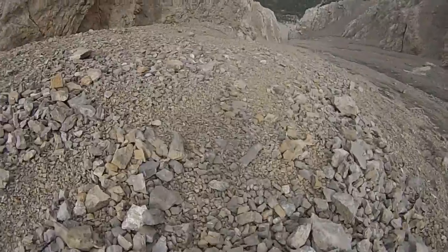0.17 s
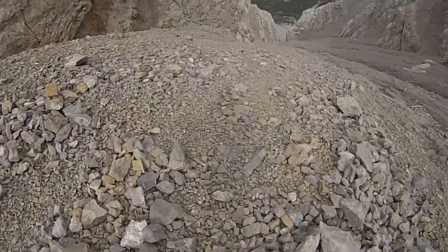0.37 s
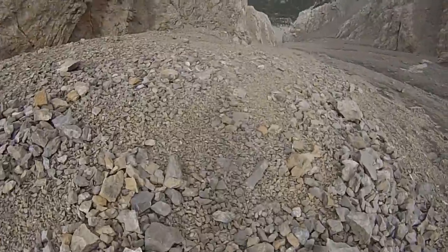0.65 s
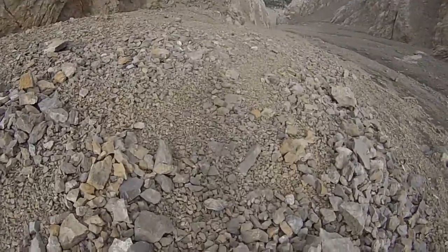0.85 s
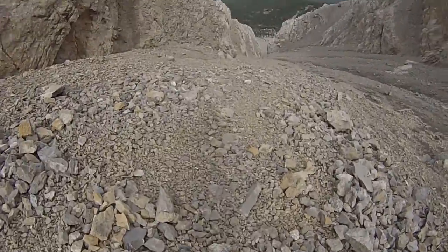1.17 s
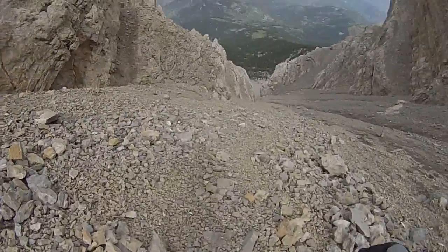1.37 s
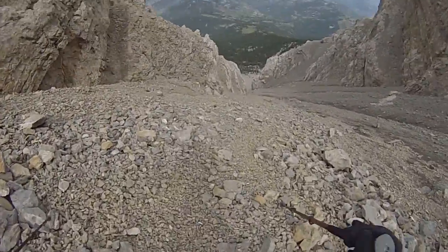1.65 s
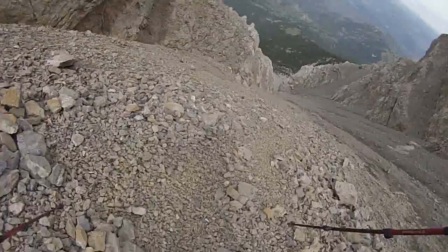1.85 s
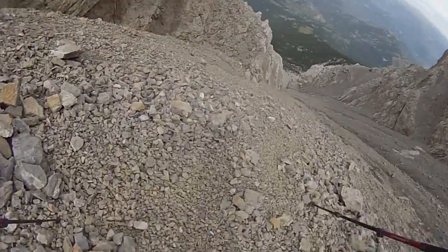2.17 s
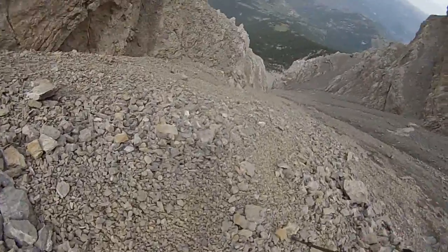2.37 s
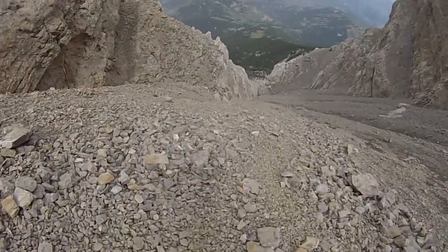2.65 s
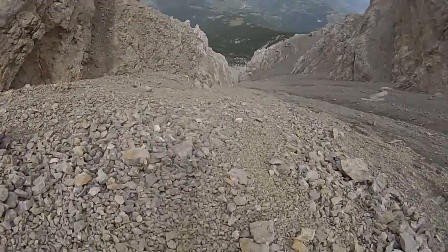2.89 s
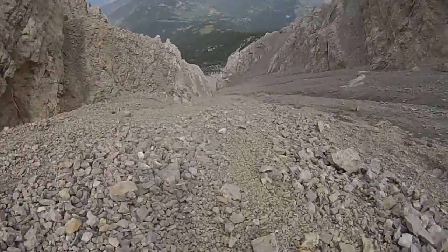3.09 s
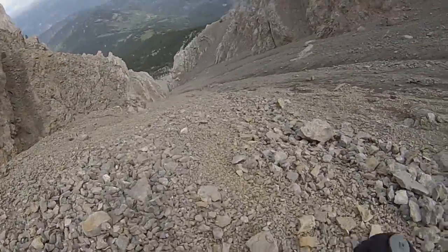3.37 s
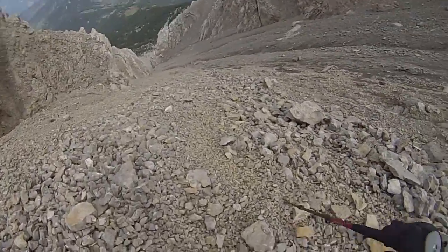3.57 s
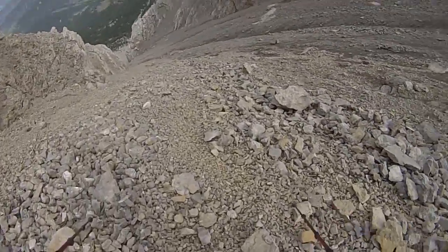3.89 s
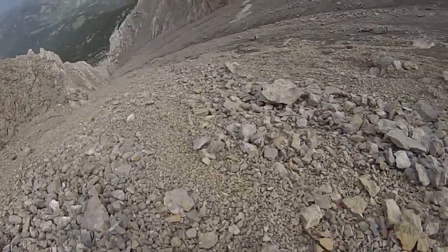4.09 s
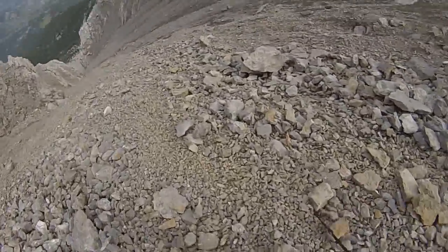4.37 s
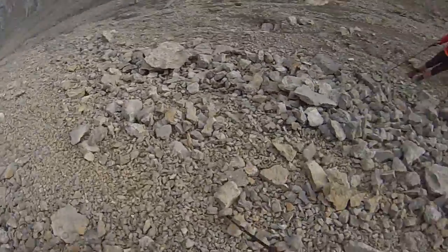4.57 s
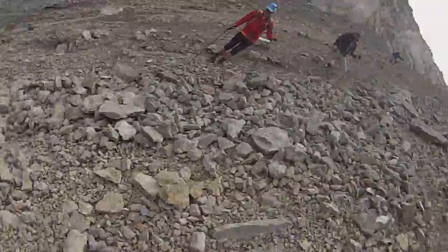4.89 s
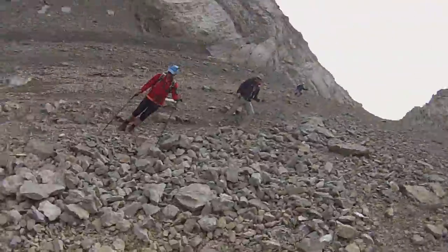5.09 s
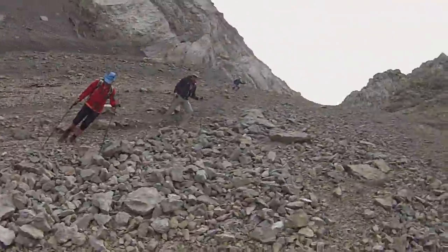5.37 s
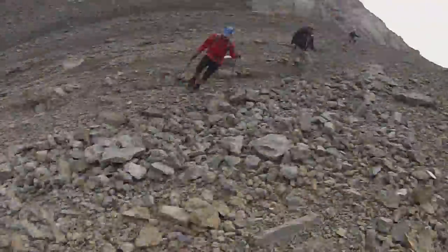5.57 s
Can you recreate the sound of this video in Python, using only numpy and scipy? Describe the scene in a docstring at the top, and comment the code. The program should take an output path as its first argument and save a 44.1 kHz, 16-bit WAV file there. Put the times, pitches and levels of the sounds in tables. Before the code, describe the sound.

Descending a steep scree slope, someone's steps grind coarse stones and fine grit. Short dry knocks of rocks and pole tips scatter over the crunch; one pole strike rattles briefly early on. The gravel hiss thickens from the middle, peaks just after four seconds with thin metal ticks and bright snaps, then eases but continues. Wind and steps jolt the enclosed microphone into low lumpy rumble; the sound is mono and hollow.

```python
"""Boots slide over loose scree on a steep slope, heard from inside a hard sealed case.
From the start, wind and steps shake the case into a rumble (shaped noise) over a faint steady hiss.
Stones and grit crunch (many tiny rings) and single stones and pole tips knock (noise and rings);
at 1.8 s a pole tip chatters on rock and scrapes (noise through the modes of its shaft).
After 4 s a small metal part tinkles (fading sines) and grit snaps (short noise); the slide goes on."""
import sys
import numpy as np
from scipy import signal
from scipy.fft import rfft, irfft, next_fast_len
from scipy.io import wavfile
from scipy.ndimage import uniform_filter1d

SR = 44100
rng = np.random.default_rng(int(sys.argv[2]) if len(sys.argv) > 2 else 0)


def bounce(signal):
    """Save signal as a 16-bit WAV file at the path given by the first command-line argument."""
    frames = np.transpose(np.atleast_2d(signal))
    limited = np.clip(frames, -1, 1)
    pcm = np.round(limited * 32767).astype(np.int16)
    wavfile.write(sys.argv[1], SR, pcm)


N = 253134  # length in samples


def amp(db):
    """Turns decibels into a plain amplitude factor."""
    return 10 ** (np.asarray(db) / 20)


def evened(x):
    """Scales a sound to rms 1, so that its level can be set afterwards."""
    return x / np.sqrt(np.mean(x ** 2) + 1e-20)


def read(points, hz):
    """Reads a curve between its points, along a logarithmic pitch scale."""
    f, value = np.transpose(points)
    return np.interp(np.log(hz + 1), np.log(f + 1), value)


def columns(rows):
    """Draws each level column of a table as a smooth line over time."""
    s, *values = np.transpose(rows)
    return [np.interp(np.arange(N) / SR, s, v) for v in values]


def add(mix, s, sound):
    """Lays a short sound into the mix at s seconds, cut off at the end."""
    part = mix[round(s * SR):][:len(sound)]
    part += sound[:len(part)]


def band_filter(order, lo_hz, hi_hz):
    """A filter that lets one band of pitches through."""
    return signal.butter(order, [lo_hz, hi_hz], "band", fs=SR, output="sos")


def noise(spectrum):
    """Steady noise of rms 1 with the given spectrum."""
    hz = np.fft.rfftfreq(N, 1 / SR)
    white = rfft(rng.standard_normal(N))
    return evened(irfft(white * amp(read(spectrum, hz)), N))


def flutter(length_s):
    """Slow chance of rms 1 that changes over about length_s."""
    size = max(int(length_s * SR), 2)
    once = uniform_filter1d(rng.standard_normal(N), size)
    return evened(uniform_filter1d(once, size))


# the slide underfoot: t/s, coarse stones level/dB, fine grit level/dB
SLIDE_LEVELS = [(0, -62, -87), (.22, -67, -80), (.4, -50, -63.5), (.64, -46.5, -58), (.8, -50, -58),
                (.9, -57, -70.5), (1.32, -57.5, -74), (1.47, -54.5, -59.5), (1.55, -59.5, -51),
                (1.66, -53, -55.5), (1.72, -59, -59.5), (1.96, -54.5, -63), (2.27, -62, -80),
                (2.37, -52.5, -59.5), (2.44, -55, -64.5), (2.58, -52, -49), (2.9, -52, -49.5),
                (3.2, -53.5, -52), (3.88, -52.5, -53), (4.04, -49.5, -47.5), (4.08, -46, -46.5),
                (4.72, -49, -46), (5.2, -53, -53.5), (5.45, -54, -56.5), (5.74, -54.5, -55.5)]
SLIPS_PER_S, SLIP_FADE_S = 140, 0.0057  # each slip fades to 1/e in this time
# sand follows the grit, more steeply, down to a resting level
SAND_DB, SAND_AT_GRIT_DB, SAND_STEEPNESS, SAND_REST_DB = -55, -49.5, 1.24, -70.5
# loose single stones follow the coarse crunch dB for dB
CLATTER_DB, CLATTER_AT_COARSE_DB, CLATTER_STEEPNESS = -59, -51, 1


def slide():
    """Coarse stones give the low crunch, grit the hiss, sand the bright top; single stones clatter."""
    coarse_db, fine_db = columns(SLIDE_LEVELS)
    sand_db = np.maximum(SAND_DB + SAND_STEEPNESS * (fine_db - SAND_AT_GRIT_DB), SAND_REST_DB)
    clatter_db = CLATTER_DB + CLATTER_STEEPNESS * (coarse_db - CLATTER_AT_COARSE_DB)

    # the boot slips in jerks that move all stones together; each starts at once and fades
    jerks = (rng.random(N) < SLIPS_PER_S / SR) * rng.random(N)
    slips = evened(signal.lfilter([1], [1, -np.exp(-1 / (SLIP_FADE_S * SR))], jerks))

    coarse = crunch(700, 4100, per_s=2200, spread_db=1.5, cycles=2.2, clump_db=2.0, slips=slips)
    fine = crunch(3800, 8900, per_s=4000, spread_db=2.5, cycles=0.79, clump_db=2.5, slips=slips)
    sand = crunch(8500, 14000, per_s=8000, spread_db=4.0, cycles=2.5, clump_db=2.0, slips=slips, top=4.8)
    clatter = crunch(1273, 5070, per_s=300, spread_db=3.5, cycles=4.3, clump_db=2.0, slips=slips, top=1.3)
    stones = amp(coarse_db) * coarse + amp(clatter_db) * clatter
    return stones + amp(fine_db) * fine + amp(sand_db) * sand


def crunch(lo_hz, hi_hz, per_s, spread_db, cycles, clump_db, slips, top=6, count=24):
    """Many small stones strike each other in clumps; each rings a few cycles at its own pitch."""
    hardness_db = spread_db * np.minimum(rng.exponential(1, N), top)  # few hard hits, many soft
    clumping_db = clump_db * evened(slips + 0.95 * flutter(0.043))
    struck = (rng.random(N) < per_s / SR) * rng.choice([-1., 1.], N)
    hits = amp(hardness_db + clumping_db) * struck
    stone = rng.integers(0, count, N)  # which stone is hit at each moment
    t, out = np.arange(600) / SR, np.zeros(N)
    for k, hz in enumerate(np.geomspace(lo_hz, hi_hz, count)):
        ring = np.exp(-t * hz / cycles) * np.sin(2 * np.pi * hz * t)
        out += signal.oaconvolve(hits * (stone == k), ring / np.linalg.norm(ring))[:N]
    return evened(signal.oaconvolve(out, case_taps())[:N])


# slope of sound through the case wall: f/Hz, level/dB
WALL_SLOPE = [(200, -9.5), (900, -18.5), (1300, -15.5), (3000, -4), (6000, -6), (8000, -16), (11500, -22),
              (12500, -31.5), (15000, -31)]
# resonances and notches of the air inside the case: f/Hz, width/Hz, level/dB
CAVITY_MODES = [(1538, 760, 17.5), (1792, 142, -10), (1950, 130, 0.5), (2550, 366, 8), (3300, 550, 4),
                (3946, 340, -5.5), (4570, 310, 7), (5170, 220, 8), (5580, 210, 2), (5860, 180, -9),
                (6650, 510, 6.5), (7410, 990, 8.5), (9820, 270, -5.5), (11440, 1300, 2.5)]


def case_taps():
    """Answer of case wall and cavity to a click: the phase follows from the log gain."""
    hz = abs(np.fft.fftfreq(4096, 1 / SR))
    db = read(WALL_SLOPE, hz)
    for f, width, gain_db in CAVITY_MODES:
        db = db + gain_db / (1 + (2 * (hz - f) / width) ** 2)
    # this phase lets nothing sound before the click
    response = np.exp(np.conj(signal.hilbert(np.log(amp(db)))))
    return np.fft.ifft(response).real[:1024]


# single knocks of stones and pole tips: t/s, thud peak level/dB, stone f/Hz,
# stone ring level/dB relative to thud, treble level/dB relative to thud
KNOCK_BLOWS = [(0.344, -42.5, 2860, 4.5, -5.5), (0.456, -41, 2780, -6, -19), (0.481, -43, 2620, 6, -7),
               (0.526, -41.5, 2560, -2, -10), (0.534, -47, 2630, 6, -8), (0.547, -36.5, 2660, 3, -10),
               (0.607, -44.5, 2970, 7, 4.5), (0.669, -38, 2600, -12, -20), (0.745, -46, 2650, 7.5, 4),
               (0.786, -42.5, 2510, 4, -12), (0.631, -30, 3330, -6, -30), (0.659, -41, 3300, 12.5, -26),
               (0.857, -44.5, 2500, 5, -10), (1.048, -42, 2500, 1.5, -30), (1.197, -38.5, 2400, -2, -33),
               (1.209, -44.5, 2700, 6.5, -4), (1.293, -47.5, 3260, 6, -24), (1.418, -42.5, 2520, -1, -15),
               (1.565, -43, 2570, 0, 6), (1.654, -40.5, 2400, -1.5, -22), (1.667, -44.5, 2550, 9, -13),
               (1.679, -54.5, 4540, -1, 17), (1.822, -32, 2880, -5, -13), (2.03, -52, 3220, 8.5, 4),
               (2.093, -39, 1850, 1, -25), (2.353, -42, 2620, -3, -9), (2.444, -52, 3220, 11, -15),
               (2.917, -40, 2630, 2, 3), (3.087, -53, 3300, 16, -10), (3.326, -39.5, 2600, -4, 0),
               (3.415, -38, 2600, -1, -2), (3.495, -37, 1970, 5.5, -2), (3.495, -38, 2950, 4, -6),
               (3.4963, -48, 4270, 10, 0), (3.498, -33, 2860, -1, -15), (3.509, -38, 2860, -3, -15),
               (3.531, -40, 2000, -8, -18), (3.596, -46, 2580, 6, -12), (3.606, -39.5, 2300, 1, -8),
               (3.783, -38.5, 2630, -3.5, -19), (3.911, -48, 2580, 9, -8), (3.932, -37.5, 2550, 0, -13),
               (4.01, -32, 2940, 0.5, 0.5), (4.054, -35.5, 2550, 2, -7), (4.062, -32.5, 4700, -1, -8),
               (4.152, -36, 2630, -5, -12), (4.141, -37.5, 4660, 3, -12), (4.179, -34.5, 4540, 3.5, -16),
               (4.187, -36, 3000, 0, -2), (4.284, -36, 4850, -1, -10), (4.399, -30, 4570, -5, -4),
               (4.417, -37.5, 3300, -3, 0), (4.509, -30.5, 2500, 0.5, -14), (4.569, -40, 2650, 9, -15),
               (4.58, -35.5, 2550, 4, -14), (4.605, -40.5, 2900, 7, -11), (4.633, -36, 2500, -16, -18),
               (4.828, -30.5, 3040, -1.5, -26), (4.877, -40.5, 5170, 4, -16),
               (5.044, -36.5, 4600, 4.5, -16), (5.093, -38.5, 2610, 0, -13), (5.174, -41.5, 2600, -16, -20),
               (5.248, -36, 2680, -2, -24), (5.261, -39.5, 1950, 6, -2), (5.301, -45.5, 4200, 6.5, 5),
               (5.33, -40, 2600, 0, -20), (5.375, -40, 2600, -5, -20), (5.419, -35.5, 4900, -1, 4),
               (5.43, -43, 1840, 11, -23), (5.473, -55.5, 4800, 18, -6), (5.678, -32.5, 2520, -20, -30),
               (5.694, -33.5, 2950, -4, -15), (5.706, -44.5, 4360, 7, -1)]
KNOCK_T60_S = 0.023  # main fade of a blow, down by 60 dB


def knocks():
    """A blow: dull thud, the stone's short ring, a splash of treble; loosened pebbles trickle after."""
    out, t, taps = np.zeros(N), np.arange(4000) / SR, case_taps()
    low, high = band_filter(2, 700, 1900), band_filter(1, 4300, 12500)
    blow = amp(-60 * t / KNOCK_T60_S)
    trickle = amp(-23 - 60 * t / .12)
    fade = (blow + trickle) * np.minimum(t / .001, 1)
    case_mode = np.sin(2 * np.pi * 1450 * t) * amp(-60 * t / .02)  # the case's lowest mode answers

    rattles = rng.standard_normal((len(KNOCK_BLOWS), 3, len(t)))
    for (s, db, hz, ring_db, treble_db), (a, b, c) in zip(KNOCK_BLOWS, rattles):
        thud = evened(signal.sosfilt(low, a)) + 3.5 * case_mode
        rough = evened(signal.sosfilt(band_filter(2, hz * 0.825, hz * 1.15), c))
        ring = np.sin(2 * np.pi * hz * t) * amp(-60 * t / 0.012) + 0.19 * rough
        treble = signal.sosfilt(high, b) * amp(-60 * t / 0.12)  # fades sooner than the thud's noise
        levels_db = db, db + ring_db, db + treble_db
        for part, part_db in zip((thud, ring, treble), levels_db):
            heard = np.convolve(part * fade, taps[:400])[:len(t)]
            add(out, s, amp(part_db) * heard / abs(heard).max())
    return out


# modes of the pole shaft: f/Hz, width/Hz, level/dB
SHAFT_MODES = [(1342, 255, 5.5), (1900, 340, -3.5), (2850, 290, 0.5), (3630, 300, -0.5), (4150, 320, -4),
               (5100, 410, -5), (6500, 1000, -6.5), (8000, 3400, -11.5)]
# the pole tip strikes rock, chatters, then scrapes on; the scrape level is relative to the chatter
POLE_S, POLE_DB, POLE_CHATTER_S, POLE_SCRAPE_DB, POLE_SCRAPE_T60_S = 1.7663, -35.5, .008, -9, .3


def pole():
    """Rough contact drives the modes of the shaft: a hard chatter that drops to a fading scrape."""
    out, t = np.zeros(N), np.arange(6000) / SR
    contact = rng.standard_normal(len(t))
    shaft = np.zeros(len(t))
    for hz, width, db in SHAFT_MODES:
        mode = signal.sosfilt(band_filter(2, hz - width / 2, hz + width / 2), contact)
        shaft += amp(db) * evened(mode)
    chatter = np.minimum(t / .001, 1) * amp(-2500 * np.maximum(t - POLE_CHATTER_S, 0))
    scrape = amp(POLE_SCRAPE_DB - 60 * t / POLE_SCRAPE_T60_S)
    add(out, POLE_S, amp(POLE_DB) * evened(shaft) * (chatter + scrape))
    return out


# tinkles of a small metal part; held loosely it rings on:
# t/s, level/dB before the fade, f/Hz, time to fade by 60 dB/s
METAL_TINKLES = [(4.3006, -52, 9400, .03), (4.3774, -43, 9380, .03), (4.5131, -48, 9445, 0.11),
                 (4.5346, -37.5, 9300, .025), (4.551, -58, 9445, 0.082), (4.7691, -48, 9445, 0.098),
                 (4.784, -56, 9445, 0.086), (4.7975, -52, 9400, 0.089), (4.8888, -54, 9445, 0.082),
                 (4.9601, -34.5, 9520, 0.02)]


def tinkles():
    """One thin high mode, rung now and then."""
    out, t = np.zeros(N), np.arange(5000) / SR
    for s, db, hz, t60 in METAL_TINKLES:
        fade = amp(db - 60 * t / t60) * np.minimum(t / 0.0008, 1)
        add(out, s, fade * np.sin(2 * np.pi * hz * t))
    return out


# very bright snaps of splintering grit: t/s, peak level/dB
GRIT_SNAPS = [(4.0477, -47), (4.2238, -49), (4.4784, -49), (4.4837, -45), (4.688, -35), (4.6974, -44),
              (4.7721, -49), (4.8534, -45)]
SNAP_HZ, SNAP_T60_S = 11360, 0.011


def snaps():
    """A tiny splinter of noise around one high pitch."""
    out, t = np.zeros(N), np.arange(800) / SR
    band = band_filter(2, SNAP_HZ * 0.96, SNAP_HZ * 1.03)
    bursts = rng.standard_normal((len(GRIT_SNAPS), len(t)))
    for (s, db), burst in zip(GRIT_SNAPS, bursts):
        snap = signal.sosfilt(band, burst) * amp(-60 * t / SNAP_T60_S)
        add(out, s, amp(db) * snap / abs(snap).max())
    return out


# spectrum shape of the deep rumble: f/Hz, relative level/dB per Hz
DEEP_SPECTRUM = [(7.1, -24), (12, 2), (27, 0), (39, 3), (51, -9), (62, -28), (85, -86), (150, -120)]
# spectrum shape of the upper rumble: f/Hz, relative level/dB per Hz
UPPER_SPECTRUM = [(40, -7.5), (60, 12), (100, -14.5), (150, -21.5), (220, -37.5), (400, -49), (1000, -120)]


def rumble():
    """The case rocks in deep swings with uneven thumps; harder gusts add lumpy higher pressure."""
    deep_gain, upper_gain = shaking()
    deep = amp(1.8 * flutter(0.031)) * steadied(noise(DEEP_SPECTRUM), slack=0.69)
    upper = amp(1.8 * flutter(0.065)) * steadied(noise(UPPER_SPECTRUM), slack=0.17)
    return deep_gain * evened(deep) + upper_gain * evened(upper)


def steadied(x, slack):
    """Evens out the slow swings of a noise, the more the smaller the slack."""
    swing = abs(signal.hilbert(x, next_fast_len(N))[:N])
    return evened(x / (uniform_filter1d(swing, 1500) + abs(slack)))


# gusts and jolts that shake the case: middle of the rise t/s, time until the fall/s,
# deep rumble level/dB, upper rumble level/dB relative to deep
CASE_JOLTS = [(0.06, 0.21, -44, -27), (0.284, 0.1, -27, -11), (0.453, 0.14, -33, -10.5),
              (0.628, 0.18, -29, -15), (1.204, 0.043, -40, -16), (1.46, 0.07, -28, -14),
              (1.543, 0.1, -25.5, -7), (1.774, 0.031, -37.5, -10), (2.244, 0.5, -44, -16),
              (2.537, 0.21, -26, -11.5), (2.821, 0.11, -23, -14), (2.962, 0.4, -38, -17.5),
              (3.327, 0.17, -22, -18), (3.613, 0.18, -32.5, -12), (3.918, 0.31, -30, -13.5),
              (4.079, 0.2, -27.5, -7.5), (4.332, 0.24, -31.5, -12.5), (4.686, 0.25, -30, -14.5),
              (4.989, 0.23, -32, -10.5), (5.3, 0.21, -50.5, 0)]
JOLT_RISE_S, JOLT_FALL_DB_PER_S, CALM_DB, CALM_UPPER_DB = .06, 160, -45, -63


def shaking():
    """Jolts rise fast, hold and fall over a calm floor: gains of the deep and upper rumble."""
    t = np.arange(N) / SR
    power = amp([[CALM_DB], [CALM_UPPER_DB]]) ** 2 * np.ones(N)
    for s, hold_s, db, upper_db in CASE_JOLTS:
        rise = np.clip((t - s) / JOLT_RISE_S + .5, 0, 1)
        fall = amp(-JOLT_FALL_DB_PER_S * np.maximum(t - s - hold_s, 0))
        power = power + (amp([[db], [db + upper_db]]) * rise * fall) ** 2
    return np.sqrt(power)


# spectrum shape of microphone self-noise and far air: f/Hz, relative level/dB per Hz
HISS_SPECTRUM = [(35, -55), (60, -15), (115, -17), (356, -22), (459, -22.5), (606, -25.5), (2660, -34),
                 (8650, -46), (15100, -52.5)]
HISS_DB = -61


def hiss():
    """Microphone self-noise and far air: steady noise, weaker towards the treble."""
    return amp(HISS_DB) * noise(HISS_SPECTRUM)


def scene():
    """Adds up all sources on one channel."""
    return (slide() + knocks() + pole() + tinkles() + snaps() + rumble() + hiss())[None]


EDGE_HZ = 15230  # top of the recorder's band


def record(dry):
    """The band limit of the recorder."""
    low_pass = signal.firwin(1023, EDGE_HZ, window=("kaiser", 9), fs=SR)
    return signal.oaconvolve(dry, low_pass[None], "same")


dry = scene()
out = record(dry)
bounce(out)
```